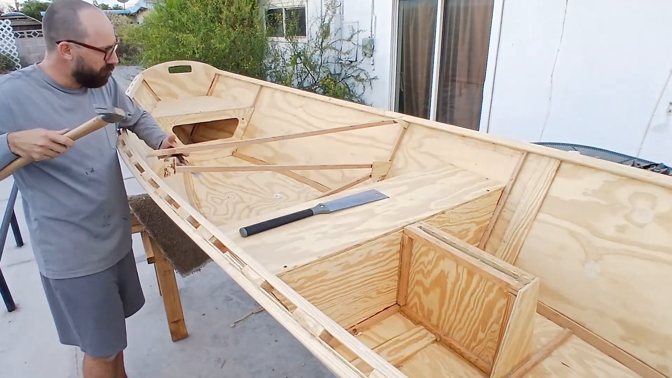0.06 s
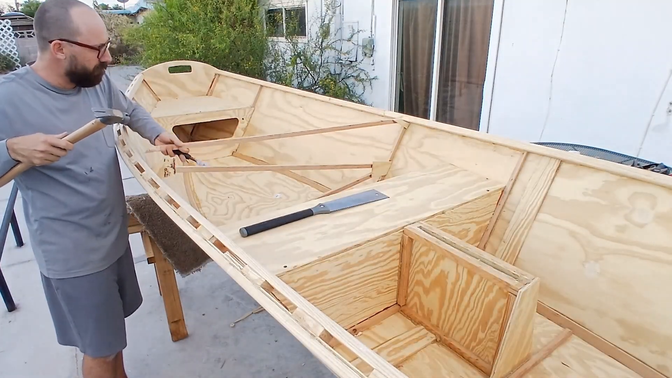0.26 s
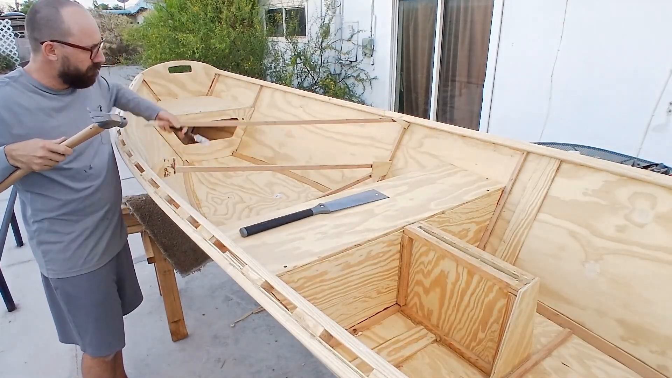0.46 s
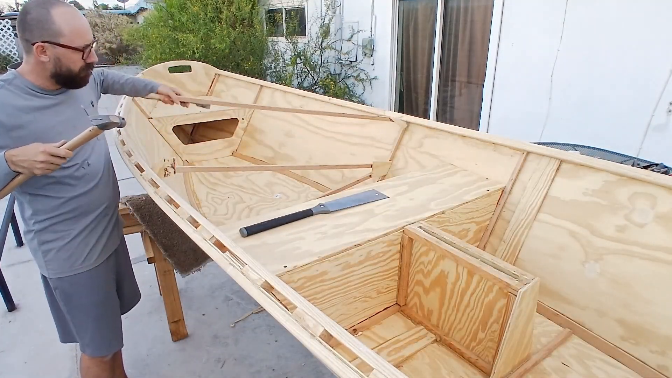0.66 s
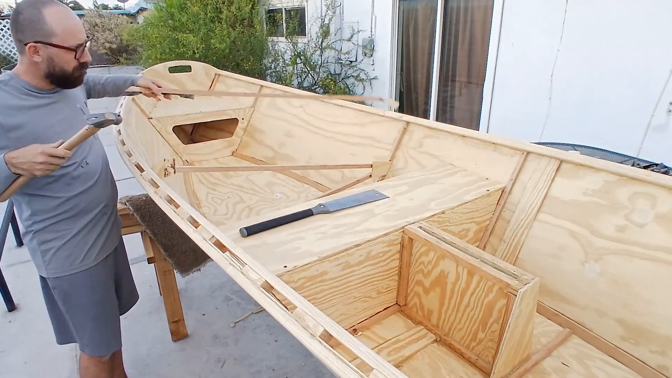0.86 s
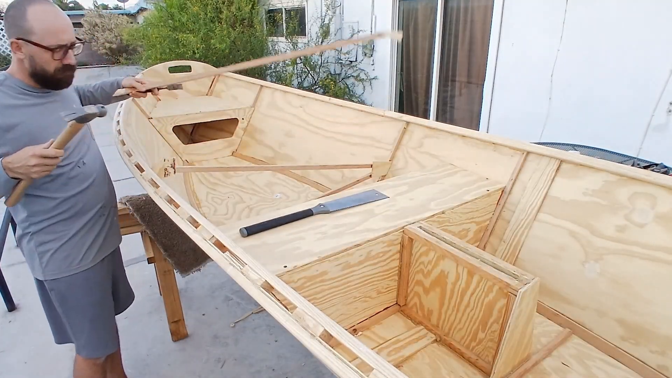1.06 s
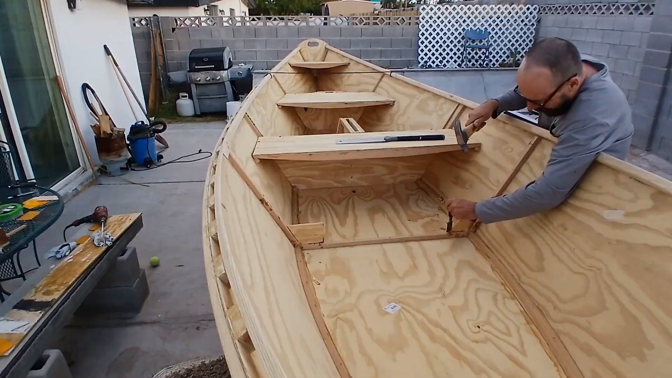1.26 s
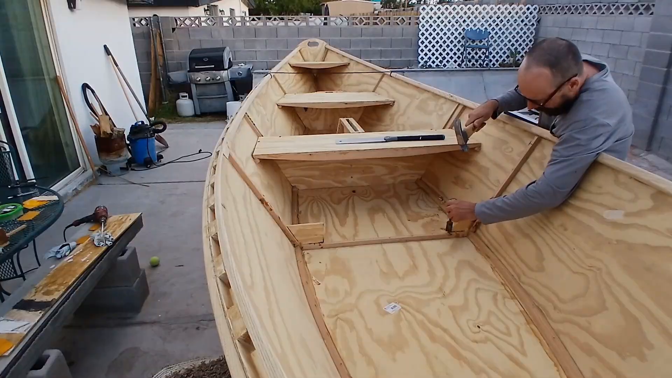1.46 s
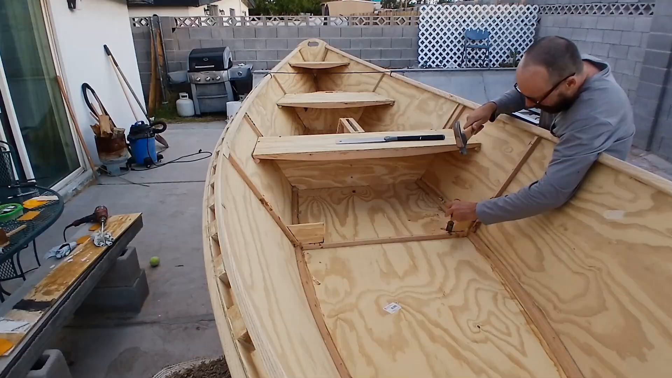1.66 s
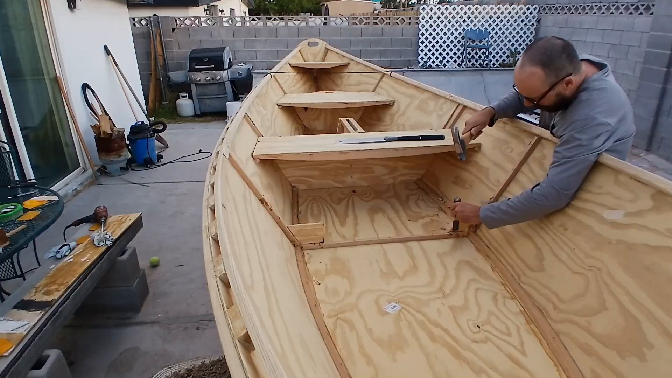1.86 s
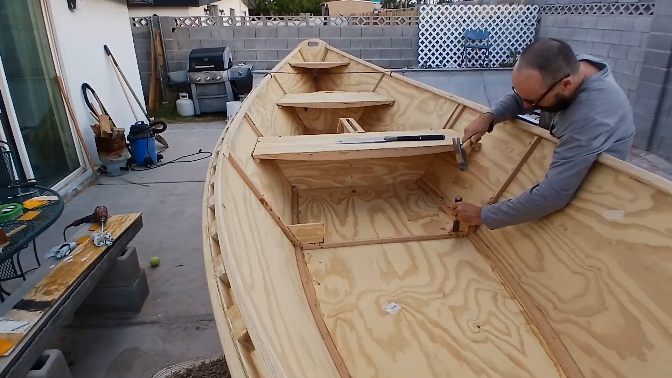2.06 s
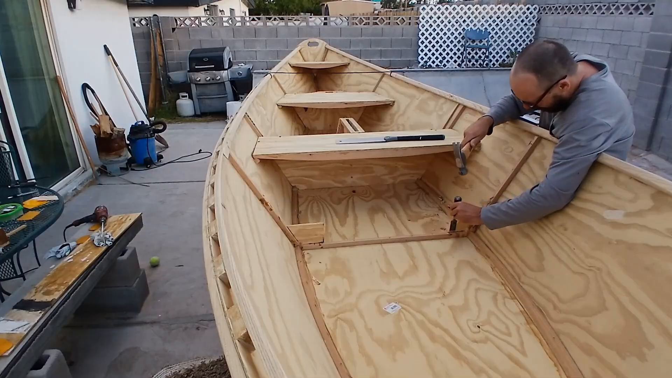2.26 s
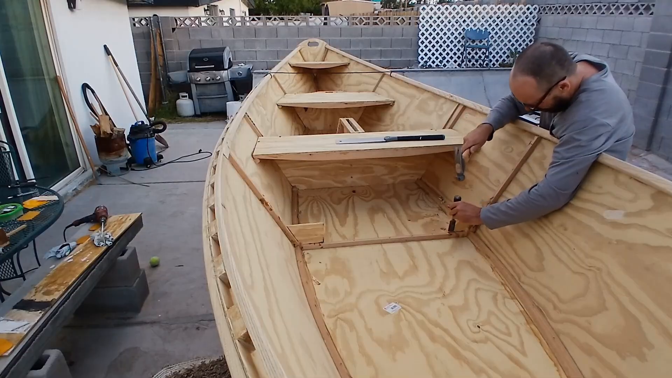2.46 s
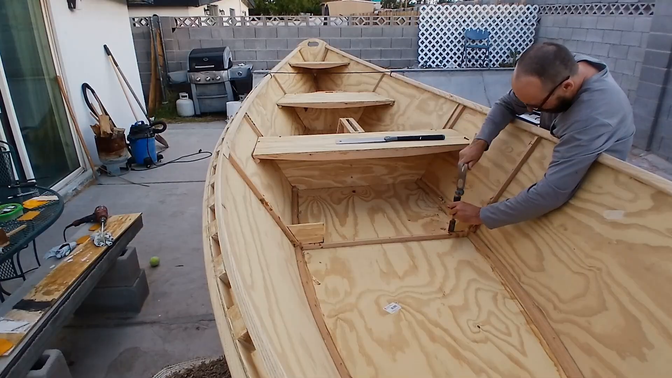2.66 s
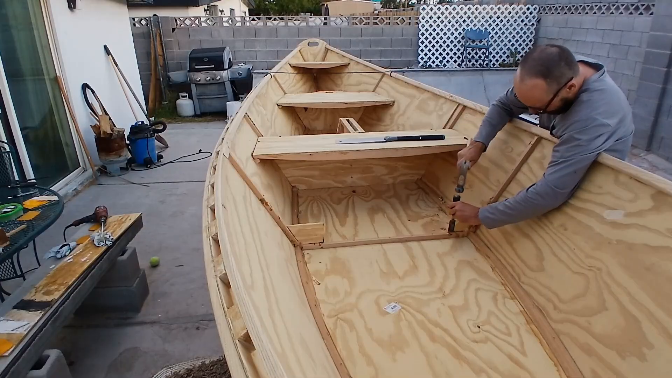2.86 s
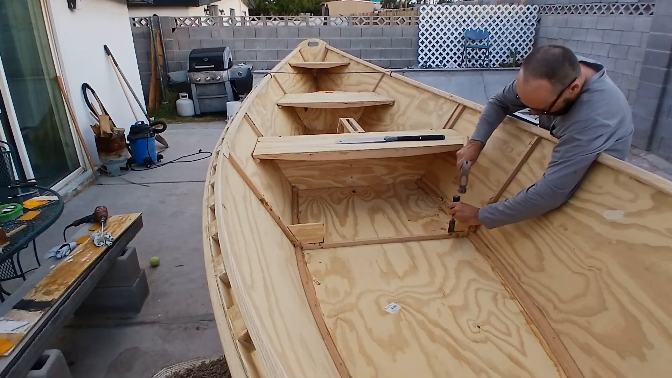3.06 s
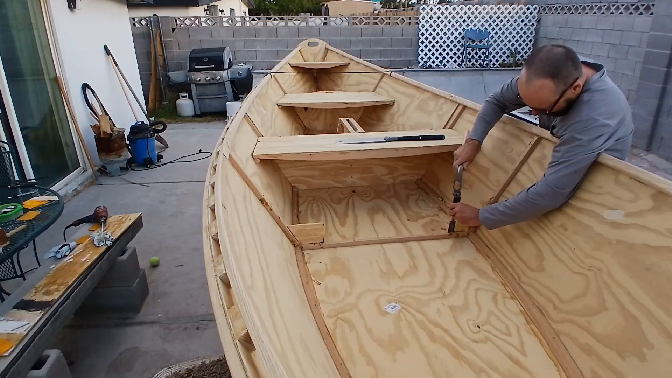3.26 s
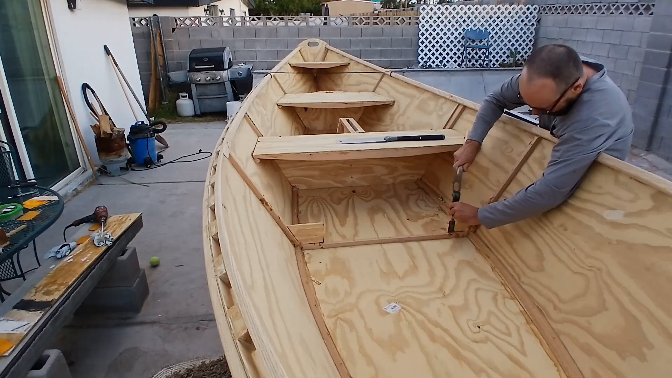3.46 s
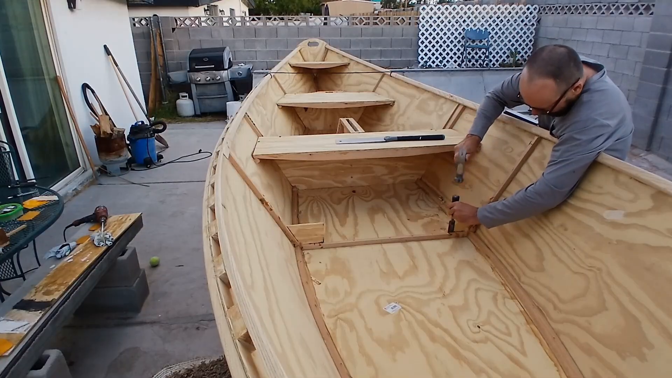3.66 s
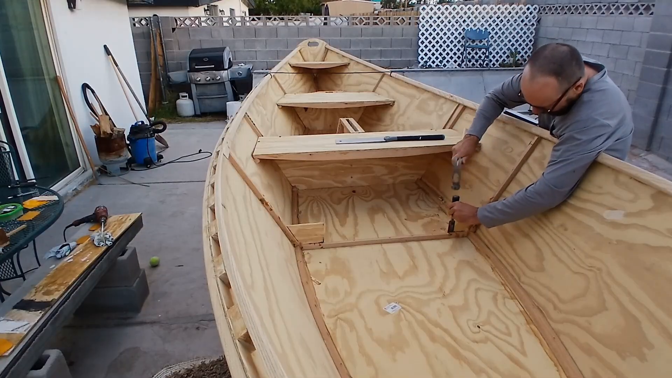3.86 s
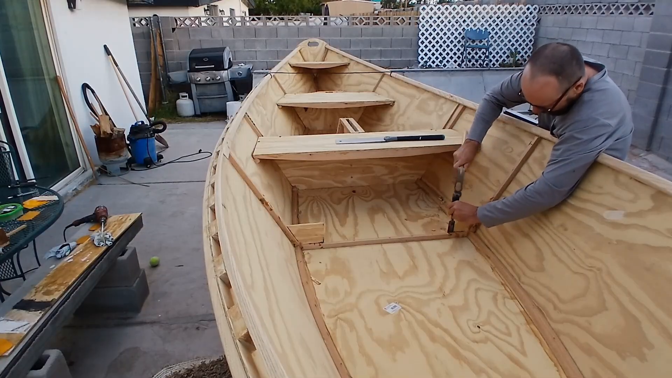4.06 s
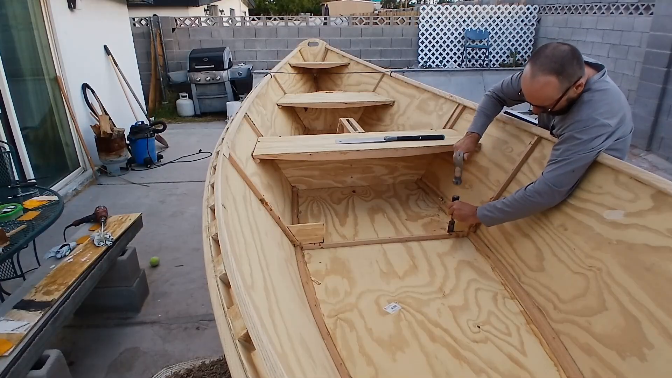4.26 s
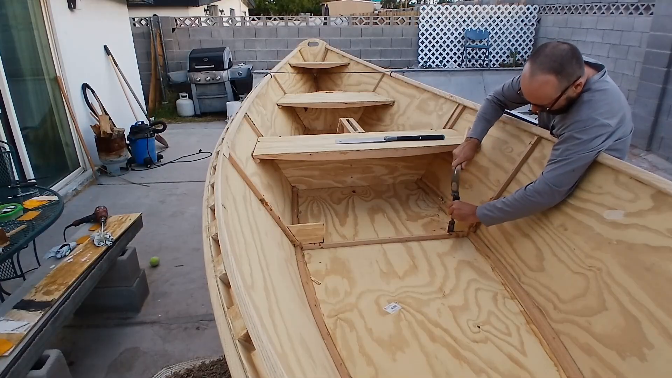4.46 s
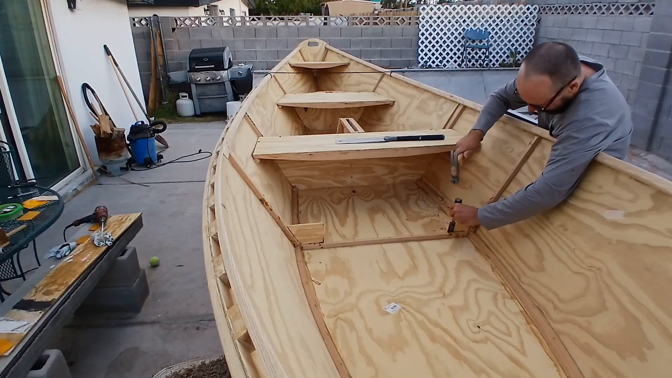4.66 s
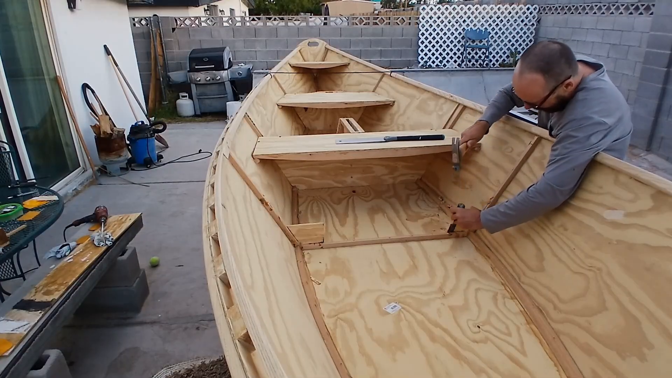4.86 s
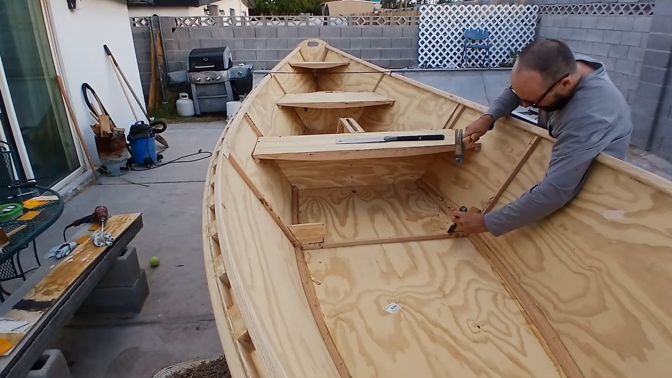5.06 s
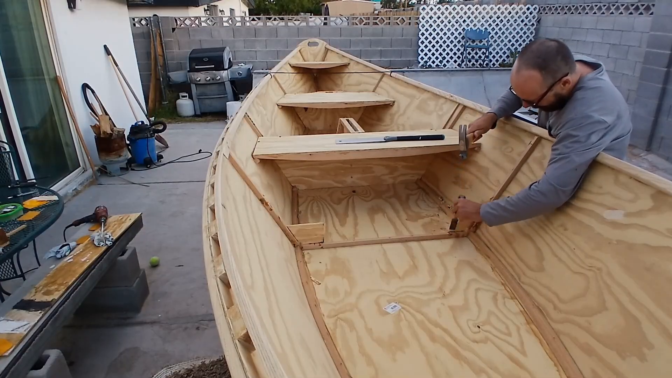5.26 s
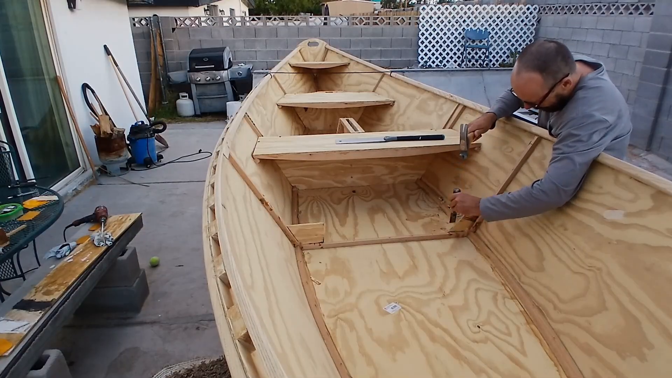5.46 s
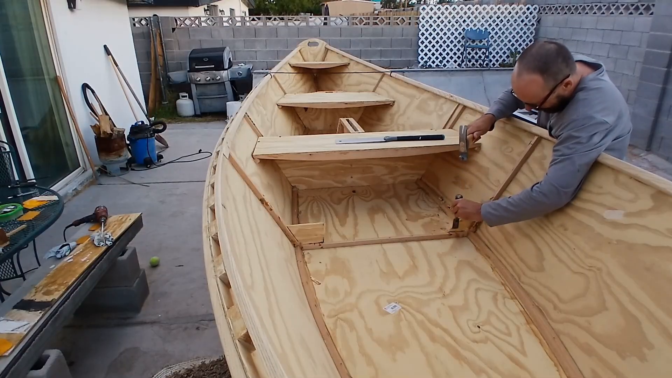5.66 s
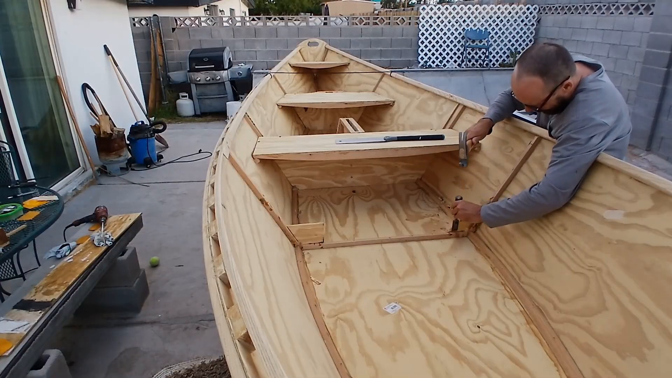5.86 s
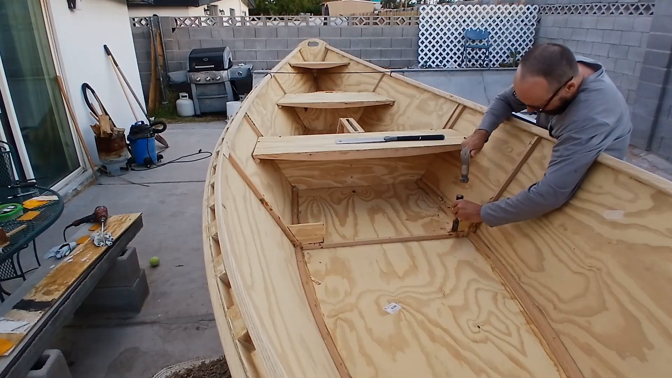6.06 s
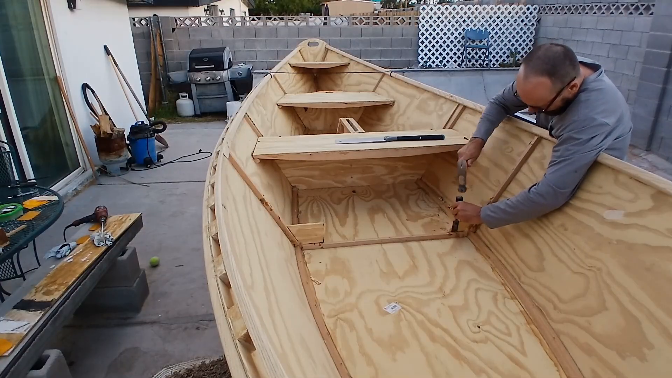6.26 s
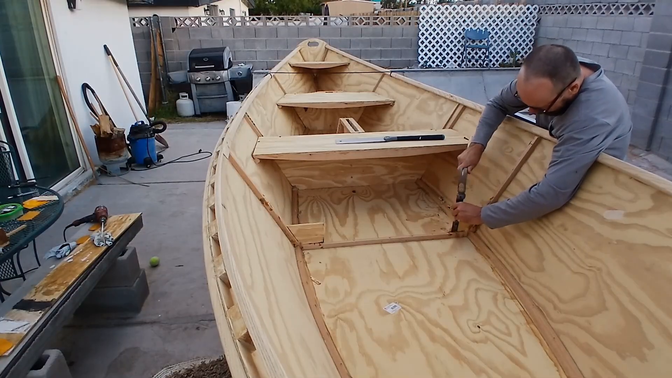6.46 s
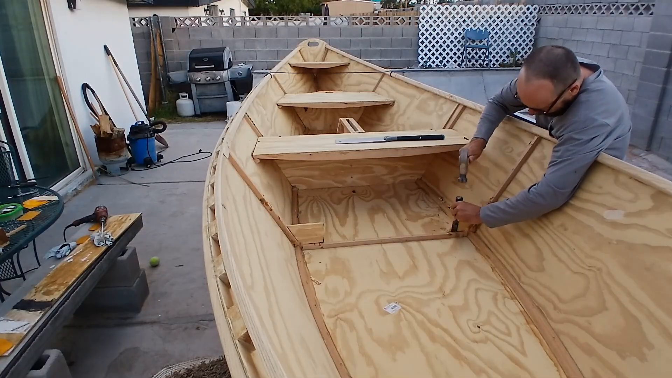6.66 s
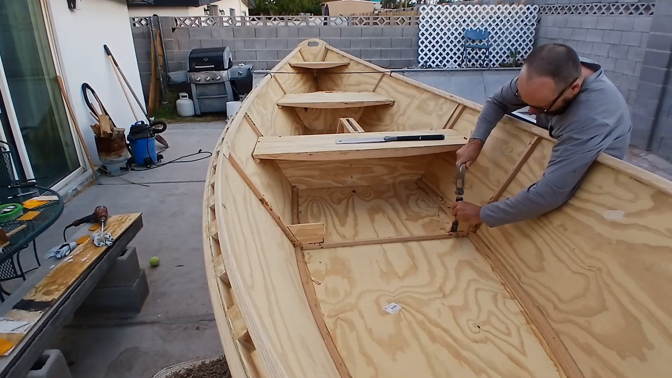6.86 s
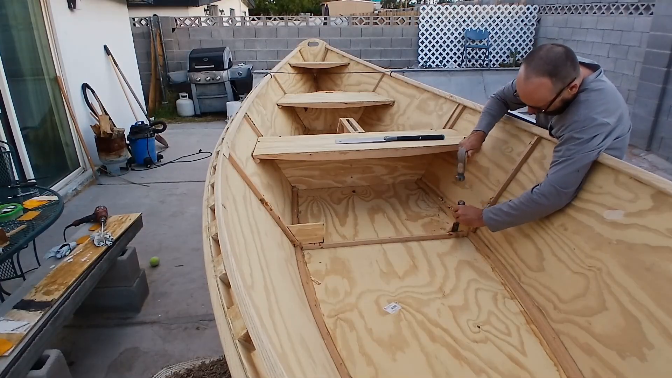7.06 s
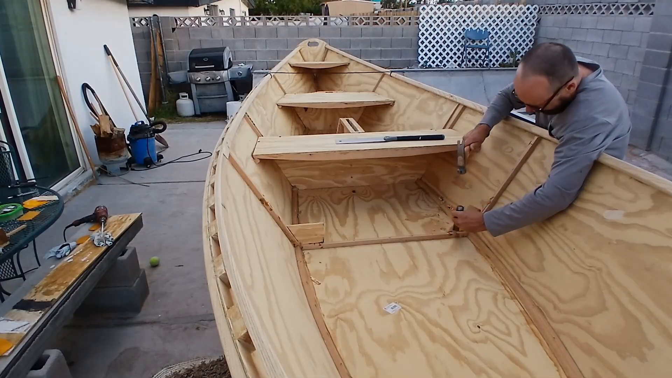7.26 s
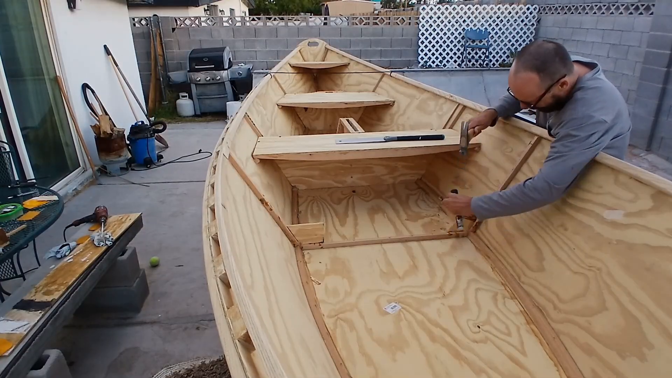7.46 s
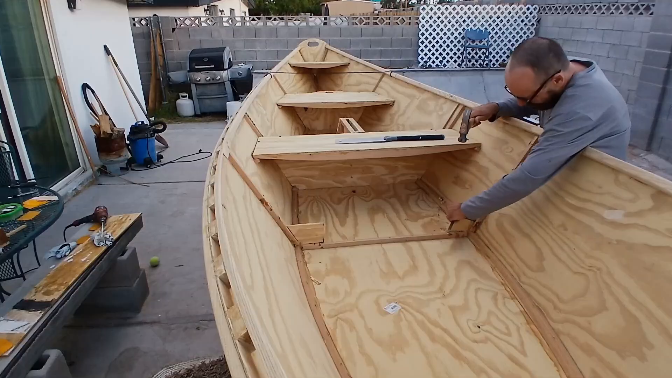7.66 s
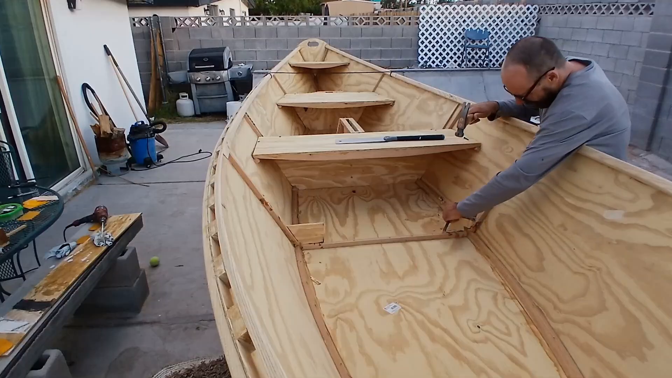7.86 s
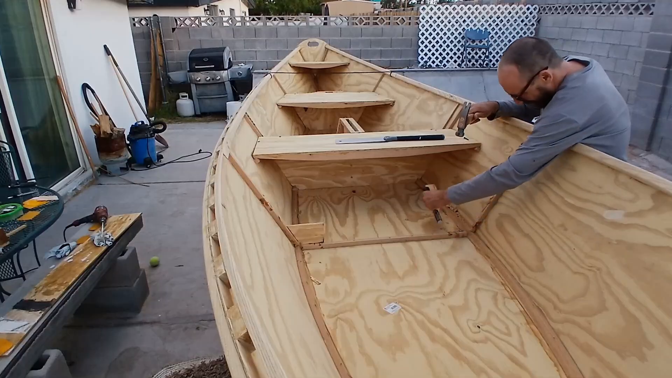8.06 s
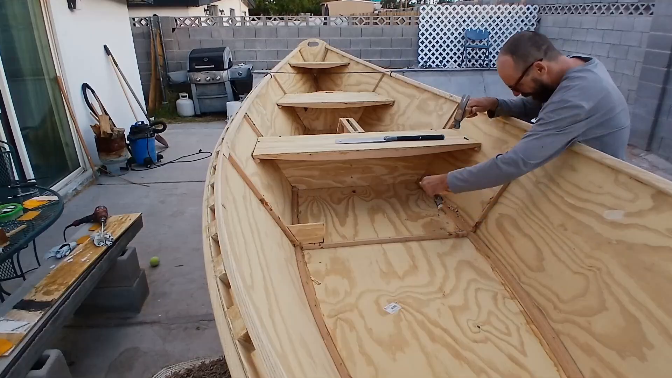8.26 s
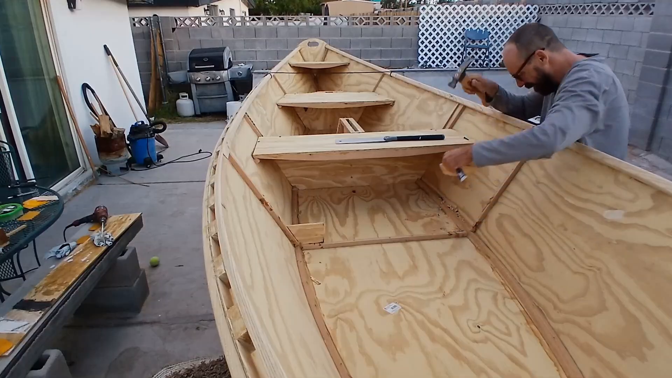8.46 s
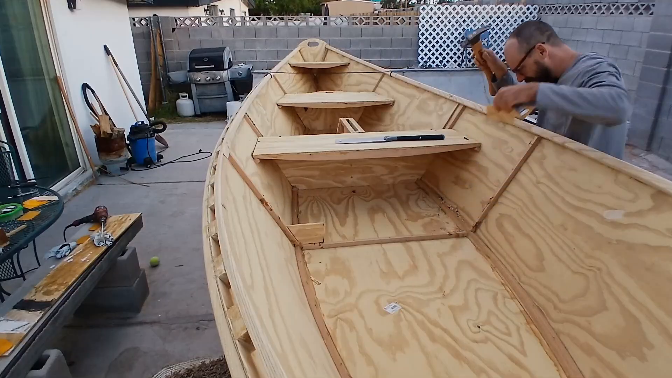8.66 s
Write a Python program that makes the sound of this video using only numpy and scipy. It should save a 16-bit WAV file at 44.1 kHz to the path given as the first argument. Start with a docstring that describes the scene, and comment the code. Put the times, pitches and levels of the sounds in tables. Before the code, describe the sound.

Tools bump a plywood boat hull and wood strips clack. A hammer then drives a chisel into wood seven times, each sharp crack booming through the hull. Wood is prised loose with loud snaps, scrapes and a squeak. Three more blows follow, then a few hollow knocks. It is heard from nearby in a walled yard, over a low hum and faint town noise.

```python
"""Work inside a plywood boat in a walled yard, over a low hum and the wash of the town.
First, hands and tools bump the hull, and wood clacks and scrapes. Then a hammer drives a chisel into a
batten (a strip of wood) seven times: each blow cracks in the chisel and booms through the hull.
Wood is prised loose with snaps and squeaks. Three more blows follow, then a few last bumps and scrapes.
After the loudest hits, an automatic volume control turns everything down and slowly back up."""
import sys
import numpy as np
from scipy import signal
from scipy.fft import rfft, irfft, next_fast_len
from scipy.io import wavfile
from scipy.ndimage import uniform_filter1d, minimum_filter1d

SR = 44100
rng = np.random.default_rng(int(sys.argv[2]) if len(sys.argv) > 2 else 0)


def pcm_store(signal):
    """Save signal as 16-bit PCM."""
    levels = np.round(np.clip(np.atleast_2d(signal), -1, 1) * 32767)
    wavfile.write(sys.argv[1], SR, levels.astype(np.int16).T)


N = 383669
SIZE = 32768  # samples in one short sound
AGE = np.arange(SIZE) / SR  # seconds since it began


def undb(db):
    """Turns decibels into a number to multiply by."""
    return 10 ** (np.asarray(db) / 20)


def unit(x):
    """Scales a sound to an average power of 1."""
    return x / np.sqrt(np.mean(x ** 2))


def fade(fade_s):
    """Falls by 60 dB in fade_s seconds."""
    return np.exp(-np.log(1000) * AGE / max(fade_s, 1e-3))


def swell(delay_s, rise_s):
    """Waits, then builds up to 1."""
    return 1 - np.exp(-np.maximum(AGE - delay_s, 0) / max(rise_s, 1e-4))


def along(points, hz):
    """Reads a table between its rows, by pitch."""
    pitches, values = np.transpose(points)
    return np.interp(np.log(hz + 1), np.log(pitches), values)


def pan(db):
    """Makes the left side db louder than the right; below zero leans right."""
    return undb(np.array([[db], [-db]]) / 2)


def add(out, start_s, sound):
    """Mixes a sound in at its start time."""
    i = max(int(start_s * SR), 0)
    out[:, i:i + sound.shape[1]] += sound[:, :N - i]


def noise(colour, size=SIZE, apart_hz=950, peaky_db=0):
    """Shaped noise with chance peaks; left and right share the bass and differ in the treble."""
    hz = np.fft.rfftfreq(size, 1 / SR)
    peaks = np.column_stack([np.geomspace(100, 16000, num=110), rng.standard_normal(110)])
    strength = undb(along(colour, hz) + peaky_db * along(peaks, hz))
    mid, side = np.exp(2j * np.pi * rng.random((2, len(hz)))) * strength
    side = side * np.minimum(hz / apart_hz, 1)
    return unit(irfft([mid + side, mid - side], size))


def tilt(x, db_per_octave, pivot_hz):
    """Makes a sound brighter or duller, like a harder or softer hit."""
    hz = np.fft.rfftfreq(SIZE, 1 / SR)
    octaves = np.clip(np.log2((hz + 1) / pivot_hz), -2, 2)
    return irfft(rfft(x) * undb(db_per_octave * octaves))


def ring(notes, scatter_db, detune, lag_s):
    """A struck thing rings with its own notes, a bit different each time and lag_s later on the left."""
    out, t = 0, np.maximum(AGE - np.array([[lag_s], [0]]), 0)
    for k, (hz, db, fade_s) in enumerate(notes):
        weight, shift = rng.standard_normal(2)
        tone = np.sin(2 * np.pi * hz * (1 + detune * shift) * t)
        out = out + (-1) ** k * undb(db + scatter_db * weight) * fade(fade_s) * tone
    return out


# The colour (mix of low and high) of the hum and the town: pitch_hz, level_db
HUM_COLOUR = [(20, -42), (50, -16), (68, -13.5), (84, 2), (100, -2.5), (120, -14.5), (180, -35.5),
              (600, -76)]
TOWN_COLOUR = [(20, -26), (45, -11), (70, 0.5), (130, -7), (220, -3.5), (400, -12.5), (800, -17.5),
               (1500, -24.5), (3000, -35.5), (6000, -48), (9000, -53), (12500, -43.5), (16000, -46.5)]
# How each rises and falls: time_s, level_db
HUM_LEVELS = [(0, -40.5), (1.2, -42.5), (1.4, -28), (2.2, -35.5), (4.4, -29), (5.3, -38), (7.0, -27),
              (7.8, -37), (8.7, -32)]
TOWN_LEVELS = [(0, -47.5), (2.6, -46), (5.399, -47), (6.9, -39.5), (7.9, -46), (8.7, -42)]

def background(steadiness=0.21):
    """A wavering low hum under the wash of the town, which swells twice near the end."""
    t, size = np.arange(N) / SR, next_fast_len(N, True)
    hum_db, town_db = (np.interp(t, *np.transpose(curve)) for curve in (HUM_LEVELS, TOWN_LEVELS))
    hum, town = (noise(colour, size)[:, :N] for colour in (HUM_COLOUR, TOWN_COLOUR))
    hum_power = uniform_filter1d(hum[0] ** 2, size=4000)
    hum = unit(hum / hum_power ** (steadiness / 2))  # evens out some of the wavering
    return hum * undb(hum_db) * pan(-1.2) + town * undb(town_db)


def jitter():
    """The quick random wobble of things sliding."""
    return unit(uniform_filter1d(rng.standard_normal(SIZE), size=120))


def stroke(length_s):
    """One smooth push of the hand."""
    return np.sin(np.pi * np.minimum(AGE / length_s, 1))


# The colour of rubbing wood: pitch_hz, level_db
RUB_COLOUR = [(300, 6.5), (1000, -0.5), (2000, -4), (3300, -4), (4600, -6), (7000, -18.5), (9500, -14),
              (16000, -22)]
# Wood scrapes on wood: start_s, length_s, level_db
WOOD_SCRAPES = [(0.416, 0.087, -37), (0.61, 0.12, -54.5), (1.81, 0.11, -44.5), (2.164, 0.12, -52.5),
                (2.289, 0.072, -55), (4.816, 0.14, -33.5), (5.254, 0.13, -40.5), (7.867, 0.076, -40.5),
                (8.354, 0.12, -53.5)]
# The blade squeaks in the cut: start_s, length_s, pitch_hz, level_db
BLADE_SQUEAKS = [(5.253, 0.089, 976, -40), (5.323, 0.058, 706, -25.5)]

def rubbing(grain_db=2.0, waver=0.025):
    """Wood fibres catch and slip: uneven slipping scrapes, steady slipping squeaks."""
    out = np.zeros((2, N))
    for start_s, length_s, db in WOOD_SCRAPES:
        scrape = noise(RUB_COLOUR) * unit(undb(grain_db * jitter()))
        add(out, start_s, scrape * stroke(length_s) * undb(db))
    for start_s, length_s, hz, db in BLADE_SQUEAKS:
        tone = np.sin(2 * np.pi * np.cumsum(hz * (1 + waver * jitter())) / SR)
        squeak = tone * unit(undb(grain_db * jitter()))
        add(out, start_s, squeak * stroke(length_s) ** 2 * undb(db) * pan(-1.2))
    return out


# How long hull and yard keep sounding: pitch_hz, fade_s
FADE_TIMES = [(100, 0.61), (250, 0.59), (600, 0.44), (1500, 0.21), (3500, 0.28), (12000, 0.51)]

def die_away(x):
    """Hull and yard let each octave fade at its own speed; the bass lasts longest."""
    octave = np.log2(np.fft.rfftfreq(SIZE, 1 / SR) + 1)
    spectrum, out = rfft(x), 0
    for k in range(5, 15):
        band = irfft(spectrum * np.maximum(1 - abs(octave - k), 0))
        out = out + band * fade(along(FADE_TIMES, 2. ** k))
    return out


# The planks' own notes: pitch_hz, level_db, fade_s
PLANK_NOTES = [(267.3, 2.5, 0.22), (310.4, -6, 0.41), (346, -7, 0.29), (435.8, 0, 0.18), (498, -7.5, 0.11),
               (538, -3, .22), (564, -5.5, 0.19), (694, -7.5, 0.2), (786, -2, .12), (837, -8, 0.19),
               (947, -8, 0.14), (1048, -5.5, 0.099)]

def plank_ring(scatter_db, detune, lag_s):
    """Knocked planks give a short, woody ring."""
    return ring(PLANK_NOTES, scatter_db, detune, lag_s)


# The hull's own notes, lowest first: pitch_hz, level_db, fade_s
HULL_NOTES = [(54, -18.5, 1), (78.6, -10, 0.71), (96.2, -5.5, 1), (120, -1, 0.45), (141, -8, 0.71),
              (163.4, -5.5, .24), (186.9, -12.5, 0.52), (212.4, -17, 0.35), (226.3, -19.5, 0.56)]

def hull_boom(scatter_db, detune, lag_s, rise_s, skip_lowest=0):
    """The whole hull shakes, building up to a deep boom."""
    return ring(HULL_NOTES[skip_lowest:], scatter_db, detune, lag_s) * swell(0, rise_s)


# The colour of a bump: pitch_hz, level_db
BUMP_COLOUR = [(100, -18), (200, 5.5), (330, 6), (520, -6), (740, -2.5), (1200, -14), (3000, -9.5),
               (6000, -11.5), (16000, -56.5)]
# Hands and tools bump the hull: start_s, level_db, pitch_hz, muffle_above_hz
HULL_BUMPS = [(0.122, -32, 1046, 2100), (0.158, -38, 237, 706), (0.441, -25, 447, 1890),
              (1.352, -21.5, 295, 1020), (1.883, -39, 324, 600), (2.526, -21.5, 387, 460),
              (4.846, -28, 334, 2466), (5.159, -18.5, 297, 674), (5.359, -26.5, 350, 960),
              (7.460, -12, 723, 800), (7.550, -24.5, 755, 800), (7.865, -30, 720, 2530),
              (7.909, -34.5, 156, 1494)]

def bumps(knock_db=-4, plank_db=-12, thud_db=-1, spot_db=-17.5, spot_growth=0.42, spot_fade_s=0.14):
    """A soft bump rings the spot it touches, along with the planks and the hull."""
    out = np.zeros((2, N))
    for start_s, db, hz, muffle_hz in HULL_BUMPS:
        knock = undb(knock_db) * die_away(noise(BUMP_COLOUR, peaky_db=2.5)) * (0.35 + fade(0.11))
        planks = undb(plank_db) * plank_ring(scatter_db=1.7, detune=0.03, lag_s=0.00041)
        muffle = signal.butter(2, muffle_hz, fs=SR, output="sos")  # softer touch, less treble
        wood = signal.sosfilt(muffle, undb(db) * (knock + planks))
        spot_note = (hz, spot_db + spot_growth * db, spot_fade_s)  # grows more slowly than the bump
        spot = ring([spot_note], scatter_db=0.8, detune=0.009, lag_s=0.00036)
        panel_db = -3.5 * np.log2(hz / 330)  # a low spot is a big panel and shakes the hull more
        thud = hull_boom(scatter_db=3.9, detune=0.02, lag_s=0.00079, rise_s=0.013, skip_lowest=2)
        add(out, start_s, (wood + spot) * swell(0, 0.001) + thud * undb(db + thud_db + panel_db))
    return out * pan(-1)


# The colour of a snap: pitch_hz, level_db
SNAP_COLOUR = [(200, -11), (700, -8.5), (1800, -9.5), (2700, -3), (4200, -4), (6500, -8.5), (9500, -6.5),
               (13000, -19.5), (16000, -14.5)]
# A loose batten's own notes: pitch_hz, level_db, fade_s
BATTEN_NOTES = [(1424, -12, 0.1), (2413, -10, 0.073), (2750, 3, 0.021), (3070, -4.5, 0.073),
                (4470, -6.5, .025), (5030, -7.5, .03)]
# Battens clack and fibres snap; the dull ticks between blows are the chisel set back on the wood: start_s,
# level_db, brightness_db_per_octave, fade_s
WOOD_SNAPS = [(0.32, -29, 0, 0.018), (0.4047, -24, 8.5, 0.013), (0.4257, -18, 6.5, 0.03),
              (0.431, -13, -1.5, 0.014), (2.836, -27.5, -8.5, 0.0073), (3.1245, -27.5, -7, 0.0071),
              (3.694, -44, -10, 0.037), (4.58, -13.5, 2, 0.052), (4.6178, -10, -0.5, 0.027),
              (4.681, -13.5, 4, 0.029), (4.755, -33.5, 1, 0.079), (4.821, -30, 0.5, 0.1),
              (4.8444, -10, -2, 0.041), (4.8856, -23, 2, 0.084), (7.1212, -41.5, -10, 0.014),
              (7.7786, -30, -1, 0.017), (7.9034, -37, -6.5, 0.045)]

def snaps(snap_db=2, echo_db=-23, batten_db=-11, rise_s=0.0012):
    """A short, bright crack rings a batten and echoes in the yard."""
    out = np.zeros((2, N))
    for start_s, db, bright, fade_s in WOOD_SNAPS:
        crack = tilt(noise(SNAP_COLOUR, peaky_db=3), bright, 5900) * fade(fade_s)
        echo = tilt(noise(SNAP_COLOUR, peaky_db=4.5), bright - 3, 5100)  # the yard dulls the crack
        batten = ring(BATTEN_NOTES, scatter_db=2.3, detune=0.054, lag_s=0.0001)
        snap = crack + undb(echo_db) * die_away(echo) + undb(batten_db) * batten
        add(out, start_s, snap * swell(0, rise_s) * undb(db + snap_db))
    return out * pan(-4.8)


def heave(hz=90, crest_s=0.0245, width_s=0.012):
    """The boat's bottom gives under a blow and swings back and forth about twice."""
    t = AGE - crest_s
    return np.cos(2 * np.pi * hz * t) * np.exp(-(t / width_s) ** 2)


# The steel notes of chisel and hammer head: pitch_hz, level_db, fade_s
CHISEL_NOTES = [(1260, 5, .08), (1390, -19.5, 0.35), (1637, 4.5, 0.068), (1765, -7.5, 0.051),
                (1990, 1, 0.066), (2074, -16, 0.1), (2455, -2, 0.076), (2520, -20.5, 0.11),
                (2913, -4, 0.048), (2720, -6, .06), (2930, -22, 0.21), (3594, -2.5, .05),
                (4013, -4.5, 0.069), (4350, -8, 0.033), (5220, -18, 0.16)]

def chisel_ring(steel_db, handle_hz, handle_db, handle_fade_s=0.039):
    """The struck steel rings with many notes, the handle with just one."""
    steel = ring(CHISEL_NOTES, scatter_db=2.5, detune=0.007, lag_s=0.00016)
    handle = ring([(handle_hz, handle_db, handle_fade_s)], scatter_db=0.67, detune=0.0026, lag_s=54e-6)
    return (steel * undb(steel_db) + handle) * swell(0, 0.003)


def bite(crunch, steel_db, neutral_db=-22.5, bite_s=0.0086):
    """The edge crunches briefly into the wood; the less the steel rings, the brighter the crack."""
    bright = 0.1913 * (neutral_db - steel_db)
    burst = swell(0, 0.0026) * (np.exp(-(AGE / bite_s) ** 4) + 0.39 * fade(0.1))
    return tilt(crunch, bright, 2900) * burst


# The colours of the cut and of the yard's echo: pitch_hz, level_db
CRACK_COLOUR = [(150, -21), (400, 0.5), (900, -4.5), (1600, 0.5), (2050, -3.5), (2700, 4.5), (3300, -7.5),
                (4600, -7), (6000, -18), (7500, -20.5), (9500, -17), (12500, -31.5), (16000, -38)]
YARD_COLOUR = [(50, -20), (110, 3.5), (200, 15), (400, 4), (800, -5), (1500, -1), (2700, -10.5),
               (5000, -26), (7000, -31.5), (10000, -36), (16000, -45)]
# The ten blows: start_s, force_db, hull_db, steel_db, handle_hz
HAMMER_BLOWS = [(2.7287, -14.5, -13.5, -17.5, 2693), (2.9681, -14.5, -14, -25, 2420),
                (3.2115, -13.5, -12, -24.5, 2280), (3.455, -13, -13.5, -21.5, 2697),
                (3.7485, -11, -12, -18, 2800), (4.0694, -7.5, -10, -15, 2440), (4.4127, -7, -8, -10, 2840),
                (6.2176, -17, -14, -29, 3270), (6.4835, -13, -11, -25, 2840), (6.762, -7.5, -17, -32, 2605)]

def hammer(drive_db=8, crack_db=-4, echo_db=-12.5, heave_db=9, boom_db=2, plank_db=-7.5,
           chisel_db=-3.5, handle_db=-20, fresh=0.65, seating_blows=3):
    """Each blow cracks into the wood; chisel and planks ring, the yard echoes and the hull booms."""
    out = np.zeros((2, N))
    # the same spot is struck, so all blows share part of their noise
    same_crack, same_echo = noise(CRACK_COLOUR, peaky_db=1.5), noise(YARD_COLOUR, peaky_db=0.5)
    for k, (start_s, force_db, hull_db, steel_db, handle_hz) in enumerate(HAMMER_BLOWS):
        # until the edge sits firmly, more force stays in the handle and less reaches the planks
        handle_extra_db, plank_extra_db = (6.5, -12.5) if k < seating_blows else (0, 0)
        crunch = same_crack + fresh * noise(CRACK_COLOUR, peaky_db=7)
        crack = bite(crunch, steel_db) * undb(force_db + crack_db)
        chisel = chisel_ring(steel_db + chisel_db, handle_hz, handle_db + handle_extra_db)
        planks = plank_ring(scatter_db=1.8, detune=0.0044, lag_s=0.00025) * swell(0, 0.012)
        planks *= undb(force_db + plank_db + plank_extra_db)
        echo = die_away(same_echo + fresh * noise(YARD_COLOUR, peaky_db=3.5))
        echo *= swell(0.0066, 0.0026) * undb(force_db + echo_db)
        boom = hull_boom(scatter_db=3.3, detune=0.022, lag_s=0.00013, rise_s=0.032)
        add(out, start_s, (chisel + crack) * pan(-4.5) + (planks + echo) * pan(-2.3))
        add(out, start_s, heave() * undb(hull_db + heave_db) * pan(-1.6))
        # the bending takes a moment to spread through the hull
        add(out, start_s + 0.0065, boom * undb(hull_db + boom_db) * pan(-1.3))
    return out * undb(drive_db)


def scene():
    """All the sounds together, through a microphone that loses the deepest bass."""
    mix = hammer() + bumps() + snaps() + rubbing() + background()
    return signal.sosfilt(signal.butter(4, 42, "high", fs=SR, output="sos"), mix)


def record(dry, ceiling_db=-1, release_db_per_s=11, hold_s=0.44, top_hz=16000):
    """The volume drops at each loud peak, waits, then creeps back up; the highest treble is cut."""
    peak_db = 20 * np.log10(abs(dry).max(0) + 1e-9)
    cut_db = np.minimum(ceiling_db - peak_db, 0)
    half_hold = int(hold_s * SR) // 2 + 1
    held_db = minimum_filter1d(cut_db, 2 * half_hold + 1, origin=half_hold, mode="nearest")
    climb_db = release_db_per_s * np.arange(N) / SR
    volume_db = np.minimum.accumulate(held_db - climb_db) + climb_db
    smooth_db = uniform_filter1d(minimum_filter1d(volume_db, size=200), size=200)
    treble_cut = signal.ellip(8, 0.2, 70, top_hz, fs=SR, output="sos")
    return signal.sosfilt(treble_cut, dry * undb(smooth_db))


dry = scene()
out = record(dry)
pcm_store(out)
```